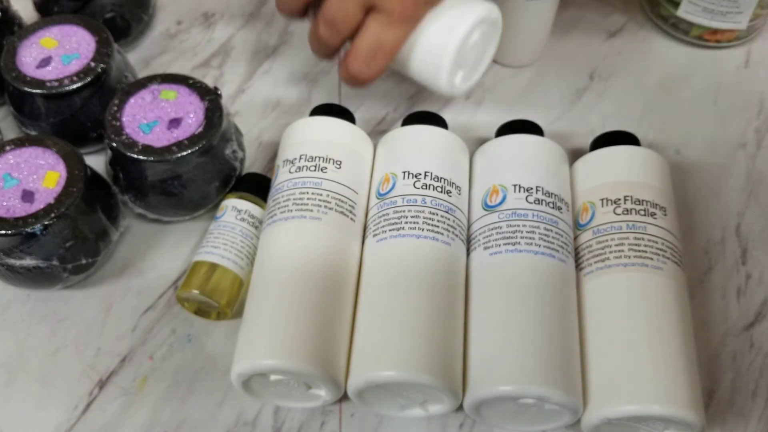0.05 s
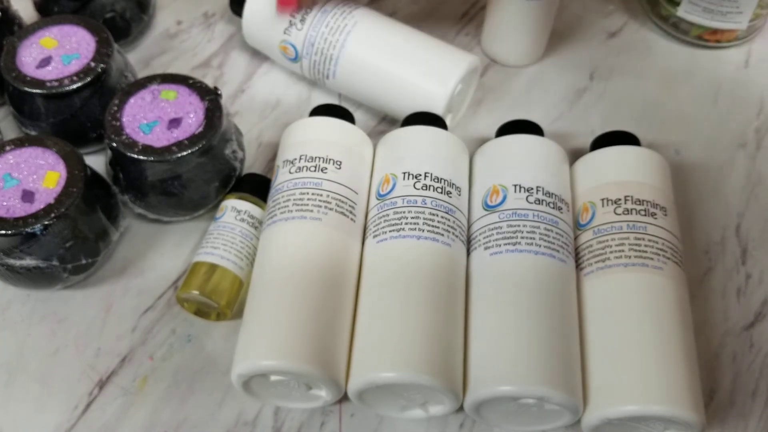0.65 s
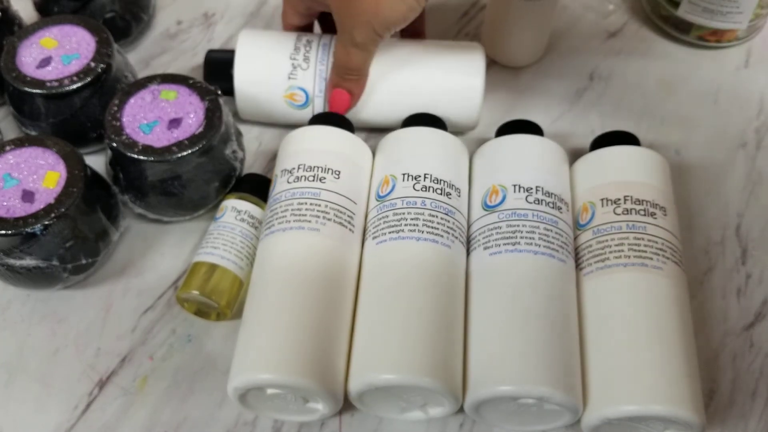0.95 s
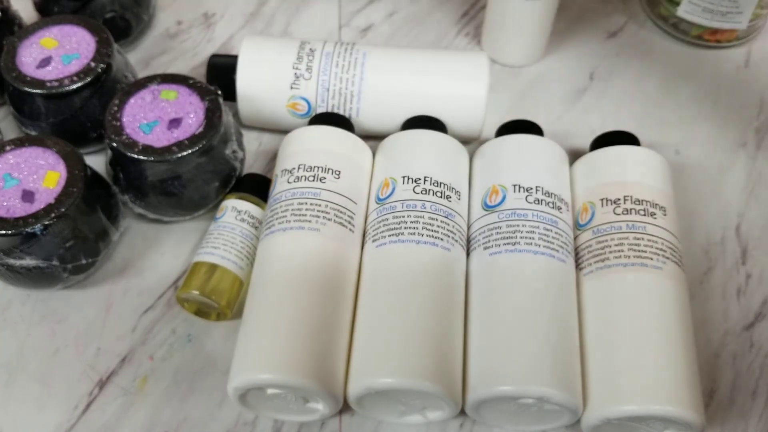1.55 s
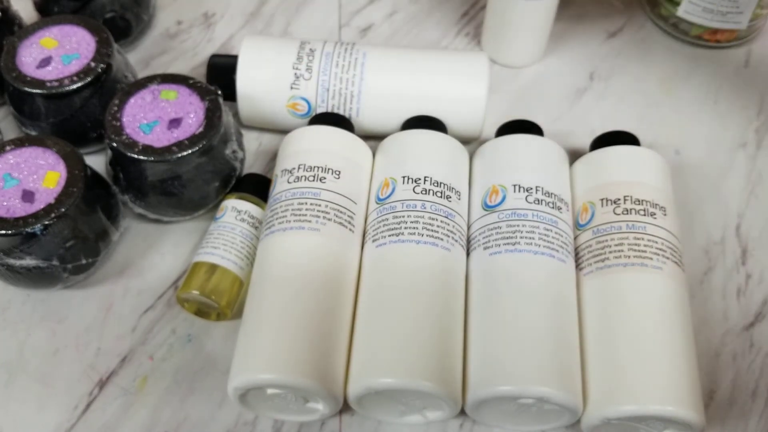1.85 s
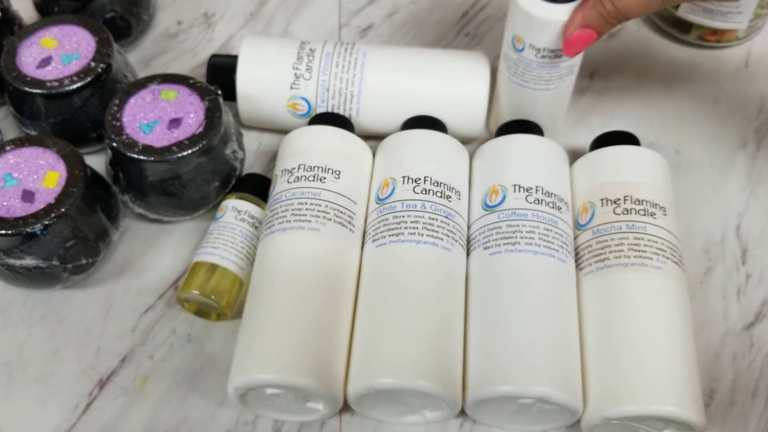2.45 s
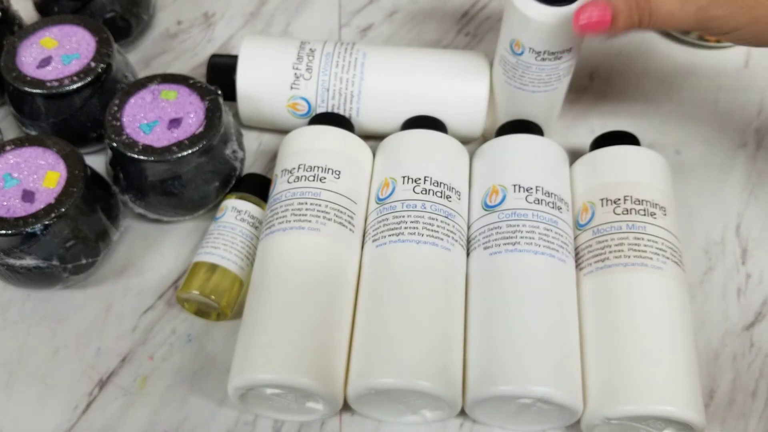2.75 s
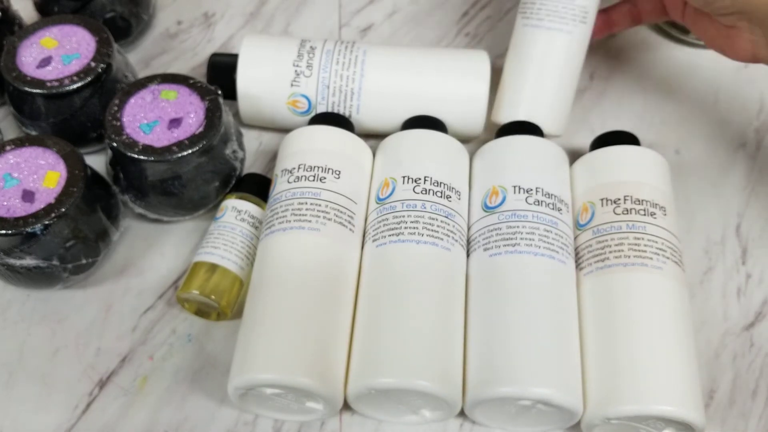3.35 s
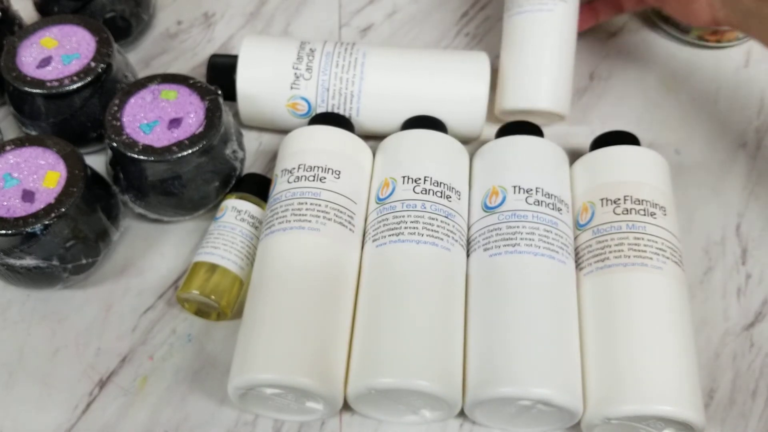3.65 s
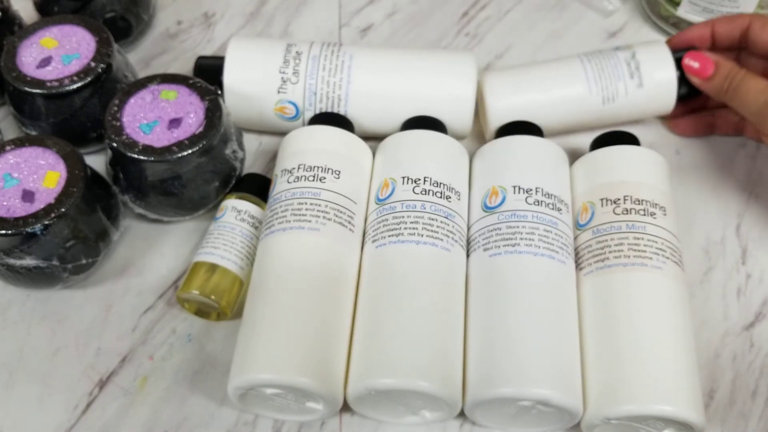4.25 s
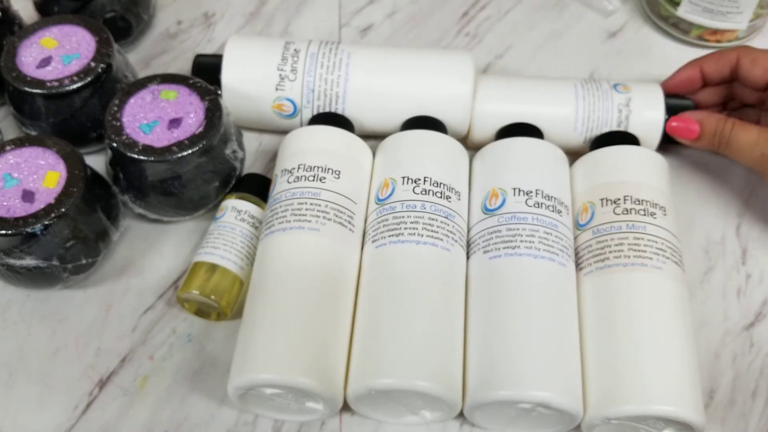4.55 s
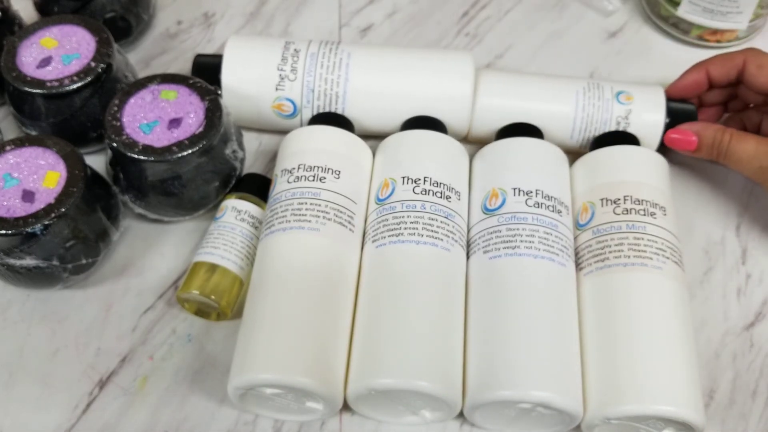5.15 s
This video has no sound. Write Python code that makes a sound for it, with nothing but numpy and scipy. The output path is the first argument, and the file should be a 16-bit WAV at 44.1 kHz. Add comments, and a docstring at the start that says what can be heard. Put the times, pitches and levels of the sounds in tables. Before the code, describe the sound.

Dull, hollow knocks and short rumbling scrapes as plastic bottles are laid down and nudged across a table, their caps ticking lightly.

```python
"""Knocks and scrapes of filled plastic bottles laid down, nudged and slid on a hollow tabletop.
Each knock rings the low modes of the board; a dragged base rumbles, hisses and sometimes judders.
Bumped bottles ring, caps and shells tick in the small room, and a glass jar buzzes after hard blows.
Around one second a few dull thumps buffet the right microphone alone. Faint room tone lies beneath."""
import sys
import numpy as np
from scipy import signal
from scipy.fft import rfft, irfft, next_fast_len
from scipy.io import wavfile

SR = 44100
rng = np.random.default_rng(int(sys.argv[2]) if len(sys.argv) > 2 else 0)


def to_wav(s):
    """Save 16-bit WAV."""
    ch = np.atleast_2d(s).T  # columns
    pcm = np.round(np.clip(ch, -1, 1) * 32767)  # PCM
    wavfile.write(sys.argv[1], SR, pcm.astype(np.int16))


N = 234253
TIME = np.arange(N) / SR
TAIL = TIME[:SR * 3 // 4]  # time axis of one ring-out

# bottle meets table: start_s, level_db, corner_hz, boom_hz
TABLE_KNOCKS = [(0.16, -46.5, 348, 235), (0.2495, -26.5, 754, 200), (.281, -32, 512.6, 223),
                (0.3136, -19, 600, 172), (0.494, -50.5, 422, 174), (1.805, -42.5, 159, 155),
                (1.872, -51.5, 170, 164), (1.927, -46.5, 383, 168), (2.024, -45, 267, 163),
                (2.041, -42, 204, 163), (2.15, -51.5, 290, 162), (2.517, -53.5, 290, 165),
                (2.556, -44, 202, 155), (3.236, -42.5, 464, 368), (3.7254, -41, 1000, 236),
                (3.8004, -39, 480, 133), (3.9322, -18.5, 800, 138), (3.98, -27.5, 400, 361),
                (4.018, -32.5, 248, 151), (4.28, -47, 910, 310), (4.3313, -53, 1750, 360),
                (4.531, -39, 227, 141)]
# loaded tabletop, also rung by slides: pitch_hz, level_db, t60_s
BOARD_MODES = [(74.2, -10, 0.38), (99.4, -21, 0.35), (123.6, -15, .3), (134.2, -5, 0.2), (159.9, -2, 0.18),
               (177, 5.5, 0.05), (238.2, -24.5, 0.4), (304.5, -8, 0.18), (328.2, -4, 0.14),
               (382.6, -1, 0.1), (423.8, -11, 0.048), (480, -11, 0.067), (507, -10.5, 0.15),
               (628, -14, 0.1163), (747.4, -14.5, 0.14), (864, -19.5, 0.2), (964, -12.5, 0.045),
               (1083, -1, 0.019), (1210, -11, 0.071), (1389, -11, 0.057), (1494, -17.5, 0.11)]
# things standing on the board: freq_hz, level_db
CLATTER_SPECTRUM = [(40, -37.5), (70, -2), (160, 1.5), (400, 2), (600, -2.5), (1100, -9), (1900, -5.5),
                    (3000, -6), (6000, -26.5), (16000, -46)]


def knocks(boom_db=7, boom_octaves=0.1, flip_hz=190, scatter_hz=450, clatter_db=-8, radiate_hz=65):
    """A blow rings the board's modes and clatters what stands on it; soft contact is slower and duller."""
    out = np.zeros((2, N))
    for start_s, level_db, corner_hz, boom_hz in TABLE_KNOCKS:
        phases = rng.uniform(0, 2 * np.pi, (len(BOARD_MODES), 1))
        phases = phases + 0.5 * rng.standard_normal((len(BOARD_MODES), 2))
        board = 0
        for (hz, mode_db, t60_s), phase in zip(BOARD_MODES, phases):
            # the place of the blow favours modes near boom_hz
            boost_db = boom_db * np.exp(-(np.log2(hz / boom_hz) / boom_octaves) ** 2)
            gain = undb(mode_db + boost_db) * np.sign(flip_hz - hz)  # low modes swing against the rest
            scatter = phase[:, None] * (hz > scatter_hz)  # short waves arrive by many paths
            board += gain * np.sin(2 * np.pi * hz * TAIL + scatter) * fade(t60_s)
        clatter = undb(clatter_db) * colour(noise(len(TAIL), 1000), CLATTER_SPECTRUM) * fade(t60_s=0.3)
        push = 1 - np.exp(-TAIL * corner_hz)
        blow = butter((board + clatter) * push, corner_hz, "low")
        blow = butter(blow, radiate_hz, "high", order=1)  # board too small to radiate long waves
        add(out, start_s, undb(level_db) * unit(blow, count=1300))
    return out


# dragging strokes: start_s, length_s, rumble_db, hiss_db, swell_db, bright_db
SLIDE_STROKES = [(0.14, 0.38, -58, -74.5, 1, -14), (0.682, 0.11, -56.5, -65, 7.5, -2),
                 (0.796, 0.066, -44.5, -61.5, 9.5, -15), (0.858, 0.032, -37.5, -53, 0, -12),
                 (.99, 0.15, -67, -73, -2, 4.5), (1.145, .025, -55.5, -70, 2, -8.5),
                 (1.786, 0.053, -71.5, -72, -4.5, 5), (1.908, 0.025, -54, -63.5, 5, 9),
                 (2.019, 0.08, -47.5, -60.5, -7, 2), (2.105, 0.047, -56.5, -69, 3, -3),
                 (2.258, .04, -67, -70, 6, 10), (2.292, 0.03, -46.5, -70, 4.5, 9.5),
                 (2.505, 0.043, -59.5, -73, 2, 5), (3.146, 0.097, -59.5, -74, 15.5, 4.5),
                 (3.263, 0.31, -51.5, -75.5, -2.5, -11), (3.691, 0.024, -50.5, -55.5, -0.5, -8),
                 (3.738, 0.13, -54, -71.5, -3.5, 7), (3.953, 0.091, -36.5, -58.5, 1.5, -0.5),
                 (4.075, 0.28, -45.5, -67.5, 0, 4.5), (4.438, 0.1, -52, -71.5, 7, -5),
                 (4.858, .14, -68.5, -78.5, 6.5, -3)]
# board under a sliding bottle: freq_hz, level_db
RUMBLE_SPECTRUM = [(30, -26), (70, -10), (140, 11.5), (210, 1), (320, 4), (480, 0), (650, -12), (850, -29),
                   (1500, -43), (2500, -29.5), (6000, -64)]
# plastic on the grain: freq_hz, level_db
HISS_SPECTRUM = [(500, -6), (1300, 7.5), (2500, -8), (3800, 0), (5200, -1), (8000, 2), (10500, -0.5),
                 (16000, 1.5)]


def slides(slips_per_s=2500, t60_s=0.27, ring_db=-4, grit_db=-6, flicker_db=1.5, split_hz=2800):
    """Dense little slips shake the board while the plastic scrapes and swishes over its grain."""
    rumble_power = scrape_power = swish_power = 0
    for start_s, length_s, rumble_db, hiss_db, swell_db, bright_db in SLIDE_STROKES:
        progress = np.clip((TIME - start_s) / length_s, 0, 1)
        power = (stroke(start_s, length_s, t60_s) * undb(swell_db * (progress - 0.5))) ** 2
        rumble_power += power * undb(rumble_db) ** 2
        scrape_power += power * undb(hiss_db - bright_db / 2) ** 2
        swish_power += power * undb(hiss_db + bright_db / 2) ** 2
    slips = unit(diffuse(rng.standard_normal((2, N)) * (rng.random(N) < slips_per_s / SR)))
    board = sum(undb(db) * np.sin(2 * np.pi * hz * TAIL) * fade(t60) for hz, db, t60 in BOARD_MODES)
    ringing = colour(signal.fftconvolve(slips, board[None], axes=1)[:, :N], RUMBLE_SPECTRUM)
    rumble = unit(colour(slips, RUMBLE_SPECTRUM) + undb(ring_db) * ringing)
    hiss = colour(unit(noise(N)) + undb(grit_db) * slips, HISS_SPECTRUM)
    hiss *= undb(flicker_db * wander(N, rate_hz=40))
    scrape = butter(hiss, split_hz, "low", order=1)
    swish = hiss - scrape
    return np.sqrt(rumble_power) * rumble + np.sqrt(scrape_power) * scrape + np.sqrt(swish_power) * swish


# bumped bottles: start_s, body_db, body_hz, body_t60_s, wall_db
BOTTLE_BUMPS = [(.040, -71, 590, 0.02, -103), (0.108, -61, 420, .07, -97), (0.16, -46, 230, .13, -79),
                (0.25, -33, 210, 0.47, -65.5), (1.925, -54.5, 461, 0.12, -64.5),
                (2.033, -52, 488, 0.22, -66.5), (2.148, -58.5, 448, 0.059, -66),
                (2.278, -69, 472, 0.36, -67.5), (3.2343, -41.5, 375.3, 0.29, -87),
                (3.729, -48.5, 250.7, 0.49, -57), (4.526, -48.5, 371, 0.14, -82)]
# thin plastic wall: pitch_hz, level_db, t60_s
WALL_MODES = [(3310, -2, 0.15), (3850, 2, 0.21)]


def bottle_bumps(detune=0.025, detune_ref_hz=3500, rise_s=0.000688, split_count=5):
    """A bump rings a bottle's thin wall and hollow body; the grip sets how long the body rings."""
    def split_mode(hz, t60_s):
        """A bottle is never quite round, so each mode splits, high ones more."""
        spread = detune * np.sqrt(hz / detune_ref_hz)
        cluster_hz = hz * (1 + spread * rng.standard_normal((split_count, 2, 1)))
        cluster = np.sin(2 * np.pi * cluster_hz * TAIL).sum(axis=0)
        return unit(cluster * fade(t60_s) * rise(rise_s), count=1300)

    out = np.zeros((2, N))
    for start_s, body_db, body_hz, body_t60_s, wall_db in BOTTLE_BUMPS:
        wall = unit(sum(undb(db) * split_mode(hz, t60) for hz, db, t60 in WALL_MODES), count=1300)
        body = split_mode(body_hz, body_t60_s)
        add(out, start_s, undb(body_db) * body + undb(wall_db) * wall)
    return out


# juddering base: start_s, length_s, level_db, slip_hz
JUDDER_STROKES = [(3.29, 0.082, -41, 135), (3.376, 0.061, -50, 166), (3.465, 0.057, -44.5, 150)]


def judder(jitter=0.0893, overtone_db=-15, t60_s=0.089):
    """A dragged base sticks and slips almost steadily; the board passes mostly the fundamental."""
    out = np.zeros(N)
    waver = wander(N, rate_hz=50.8)
    for start_s, length_s, level_db, slip_hz in JUDDER_STROKES:
        phase = 2 * np.pi * np.cumsum(slip_hz * (1 + jitter * waver)) / SR
        tone = unit(np.sin(phase) + undb(overtone_db) * np.sin(2 * phase))
        out += undb(level_db) * stroke(start_s, length_s, t60_s) * tone
    return out


# caps and shells: start_s, level_db, pitch_hz
SHELL_TICKS = [(.159, -64.5, 3640), (0.2496, -51.5, 2940), (0.314, -42.5, 2560), (.856, -61, 7900),
               (1.137, -68, 2000), (1.927, -53, 6500), (2.025, -62.5, 4400), (2.1471, -52, 4700),
               (2.148, -49.5, 11800), (2.2776, -76, 4130), (2.5536, -70.5, 8100), (3.0663, -70, 2305),
               (3.235, -59, 3220), (3.697, -54.5, 2200), (3.727, -50.5, 3100), (3.8017, -77, 735),
               (3.9328, -49, 6200), (3.9332, -43, 1500), (4.0967, -57.5, 8040), (4.2353, -46, 7000),
               (4.2779, -55, 7440), (4.331, -61, 1450), (4.3308, -59.5, 4330), (4.466, -74.5, 6600),
               (4.5255, -68, 6960)]


def ticks(shell_t60_s=0.013, shell_q=4.5, rise_s=0.00027, edge_db=-32, room_db=-17, room_t60_s=0.28):
    """A short crack and its room tail pass one broad resonance of the plastic; a little stays raw."""
    out = np.zeros((2, N))
    for start_s, level_db, pitch_hz in SHELL_TICKS:
        touch = fade(shell_t60_s) * rise(rise_s)
        room = undb(room_db) * fade(room_t60_s)
        crack = noise(len(TAIL)) * np.hypot(touch, room)
        shell = signal.lfilter(*signal.iirpeak(pitch_hz, shell_q, fs=SR), crack)
        add(out, start_s, undb(level_db) * unit(shell + undb(edge_db) * crack, count=260))
    return out


# jolts to the jar: start_s, level_db
JAR_JOLTS = [(0.158, -76), (0.336, -56), (3.954, -51.5)]
# glass jar: pitch_hz, level_db, t60_s
JAR_MODES = [(2466, -5, .38), (4188, -5, .24), (4334, -2.5, .21), (5698, -3, .2), (6560, -18, .3)]


def jar(rise_s=0.001, buzz_hz=70):
    """The shaken jar rings in a few high modes; its rattling makes them flutter."""
    out = np.zeros((2, N))
    for start_s, level_db in JAR_JOLTS:
        ring = 0
        for hz, mode_db, t60_s in JAR_MODES:
            tone = np.sin(2 * np.pi * (hz * TAIL + rng.random((2, 1))))
            rattle = 1 + wander((2, len(TAIL)), buzz_hz)
            ring += undb(mode_db) * tone * fade(t60_s) * rattle
        add(out, start_s, undb(level_db) * unit(ring * rise(rise_s), count=1300))
    return out


# buffets on the right microphone: centre_s, level_db, width_s
MIC_THUMPS = [(0.8884, -19.5, 0.0014), (.9185, -43, 0.0057), (0.9613, -19.5, 0.00044), (.9657, -7, 0.00093),
              (1.0298, -15.5, 0.00057), (1.0342, -16.5, 0.00053), (1.0419, -16.5, 0.00061),
              (1.1189, -20.5, 0.00062), (1.136, -44, 0.002)]
# flutter around them: freq_hz, level_db
FLUTTER_SPECTRUM = [(20, -41.5), (55, 13.5), (130, 3), (250, -10), (500, -18.5), (1200, -36), (3000, -69)]


def mic_thumps(rebound_delay_s=0.0079, rebound_db=-4, sway_hz=56, sway_t60_s=0.057, sway_gain=0.12,
               flutter_db=-30.5, flutter_spread_s=0.016):
    """Each thump pushes and pulls the right capsule amid low flutter; a rebound and a sway follow."""
    out = np.zeros((2, N))
    stir = 0
    for centre_s, level_db, width_s in MIC_THUMPS:
        after_s = np.maximum(TIME - centre_s, 0)
        sway = sway_gain * np.sin(2 * np.pi * sway_hz * after_s) * fade(sway_t60_s, after_s)
        rebound = undb(rebound_db) * push_pull(centre_s + rebound_delay_s, width_s=0.0026)
        out[1] += undb(level_db) * (push_pull(centre_s, width_s) + rebound + sway)
        stir += np.exp(-np.abs(TIME - centre_s) / flutter_spread_s)
    out[1] += undb(flutter_db) * stir * colour(rng.standard_normal(N), FLUTTER_SPECTRUM)
    return out


# steady background: freq_hz, level_db
ROOM_SPECTRUM = [(20, -13.5), (35, -15.5), (55, 8.5), (95, -13), (135, -3), (200, -24.5), (400, -25.5),
                 (800, -33.5), (1400, -32), (2300, -37), (4000, -47), (9500, -53.5), (13600, -31.5),
                 (16000, -52)]


def room_tone(level_db=-60):
    """Low indoor rumble under thin, high microphone hiss."""
    return undb(level_db) * lean_left(db=0.34) * colour(noise(N, split_hz=300), ROOM_SPECTRUM)


def stroke(start_s, length_s, t60_s, grip_s=0.015):
    """Envelope of a hand's push: takes hold, lasts, rings out."""
    grip = np.clip((TIME - start_s) / grip_s, 0, 1)
    return grip * fade(t60_s, np.clip(TIME - start_s - length_s, 0, 1))


def push_pull(centre_s, width_s):
    """One smooth bipolar pulse, peak 1."""
    u = (TIME - centre_s) / width_s
    return -u * np.exp((1 - u ** 2) / 2)


def rise(rise_s):
    """Exponential attack."""
    return 1 - np.exp(-TAIL / rise_s)


def fade(t60_s, age_s=TAIL):
    """Exponential decay, 60 dB down at t60_s."""
    return np.exp(-np.log(1000) * age_s / t60_s)


def wander(shape, rate_hz):
    """Smooth random drift, rms 1."""
    return unit(butter(rng.standard_normal(shape), rate_hz, "low"))


def noise(size, split_hz=900):
    """Diffuse stereo noise."""
    return diffuse(rng.standard_normal((2, size)), split_hz)


def diffuse(pair, split_hz=900):
    """Two unrelated signals to stereo: alike in the bass, unrelated in the treble."""
    side = butter(pair[1], split_hz, "high", order=1)
    return np.array([pair[0] + side, pair[0] - side])


def colour(x, spectrum):
    """Filter by (freq_hz, level_db) points; rms 1."""
    hz, db = np.transpose(spectrum)
    size = next_fast_len(x.shape[-1])
    bin_hz = np.maximum(np.fft.rfftfreq(size, 1 / SR), 1)
    gain = undb(np.interp(np.log(bin_hz), np.log(hz), db))
    return unit(irfft(rfft(x, size) * gain, size)[..., :x.shape[-1]])


def butter(x, hz, kind, order=2):
    """Low- or high-pass."""
    return signal.sosfilt(signal.butter(order, hz, kind, fs=SR, output="sos"), x)


def undb(db):
    """Decibels to gain."""
    return 10 ** (np.asarray(db) / 20)


def lean_left(db):
    """Stereo gains: left up by db, right down by db."""
    return undb([[db], [-db]])


def unit(x, count=None):
    """Scale to rms 1, over the first count samples if given."""
    return x / np.sqrt(np.mean(x[..., :count] ** 2))


def add(out, start_s, x):
    """Mix x into out at start_s."""
    i = int(start_s * SR)
    out[:, i:i + x.shape[-1]] += x[..., :N - i]


def scene(capsule_hz=45):
    """The table sounds sit near the centre; the capsules do not follow the slowest pushes."""
    table = knocks() + bottle_bumps() + ticks() + jar() + slides() + judder()
    at_capsules = table * lean_left(db=0.31) + mic_thumps()
    return butter(at_capsules, capsule_hz, "high", order=4) + room_tone()


def record(dry):
    """Steep low-pass on the top treble."""
    top_hz = 15900
    return signal.sosfilt(signal.ellip(8, 0.2, 70, top_hz, fs=SR, output="sos"), dry)


dry = scene()
out = record(dry)
to_wav(out)
```